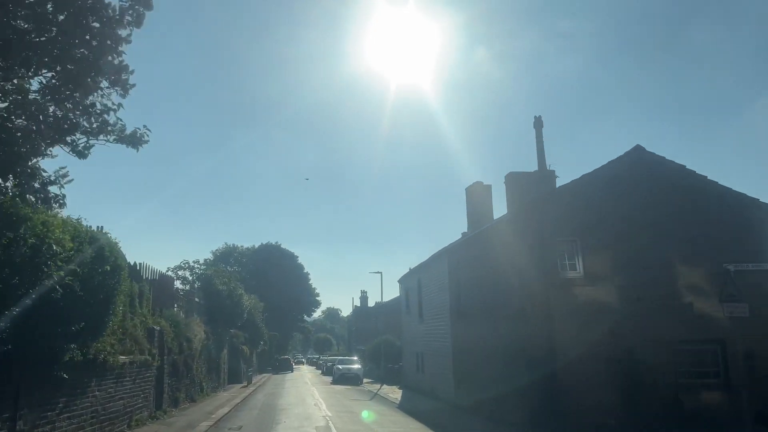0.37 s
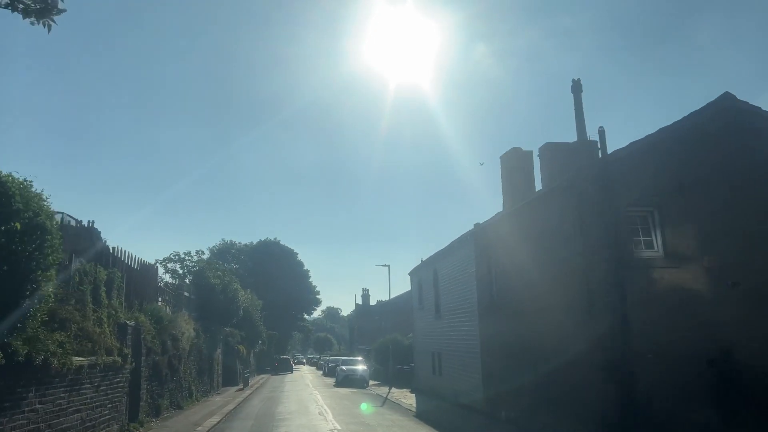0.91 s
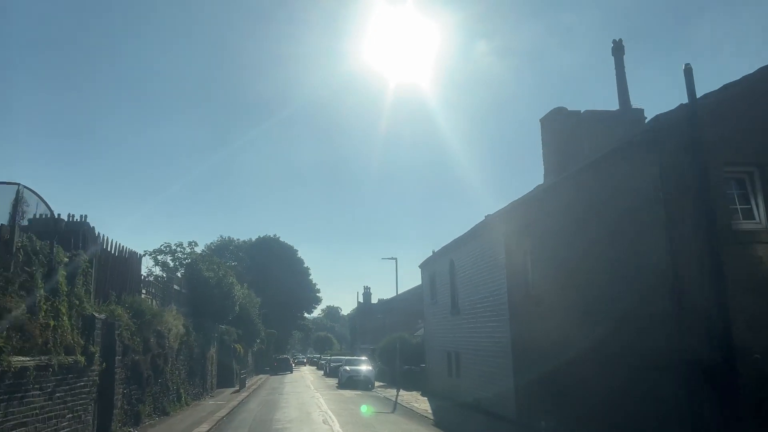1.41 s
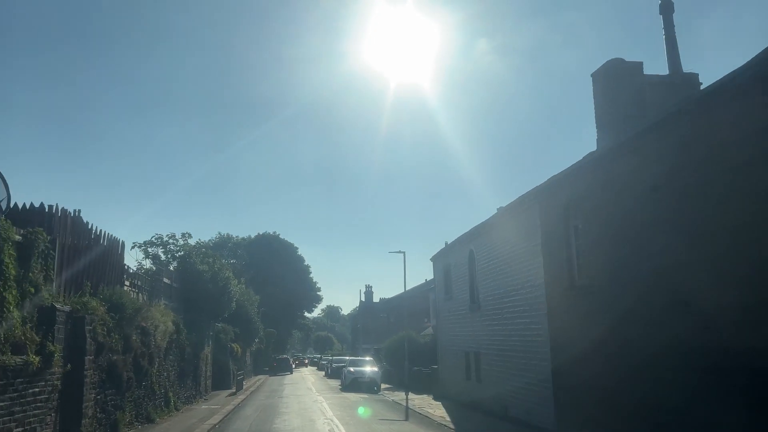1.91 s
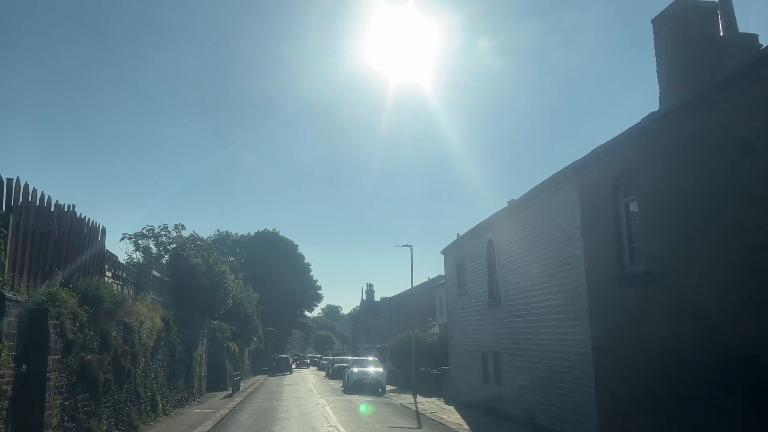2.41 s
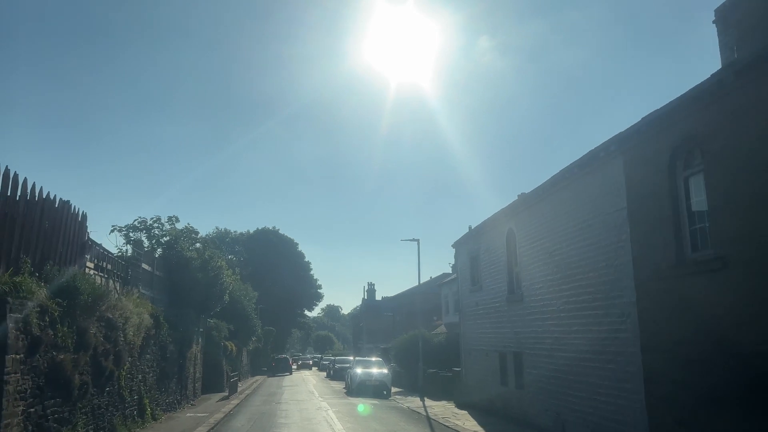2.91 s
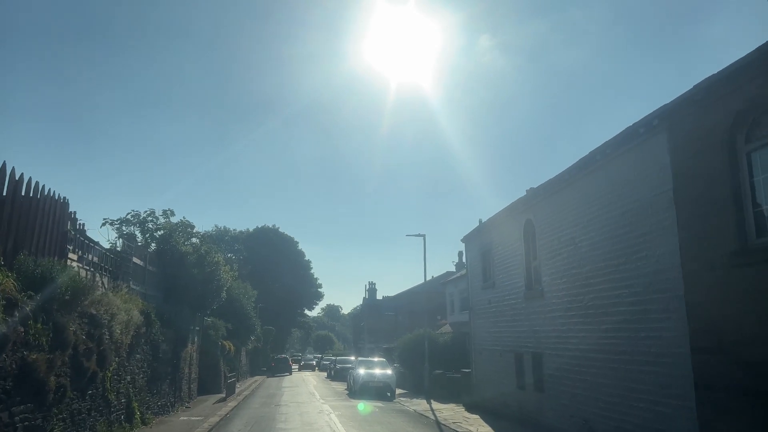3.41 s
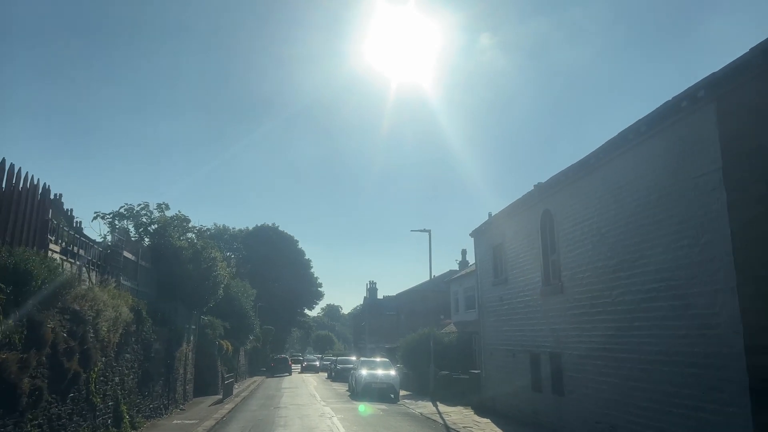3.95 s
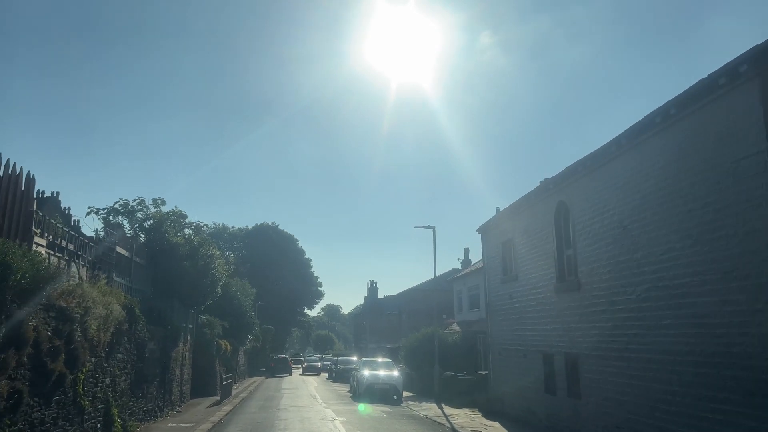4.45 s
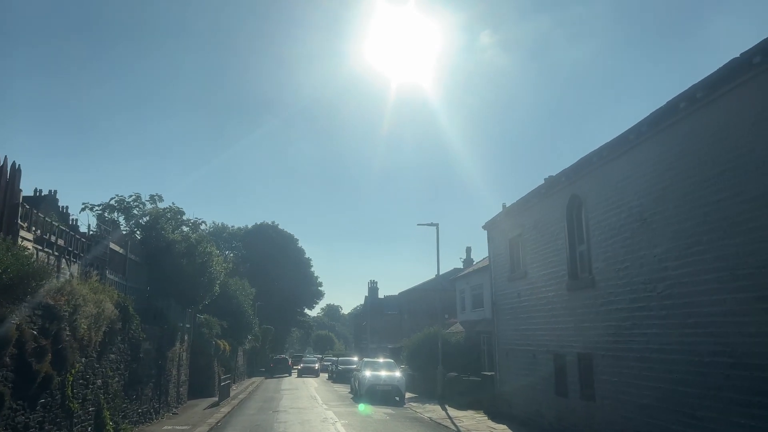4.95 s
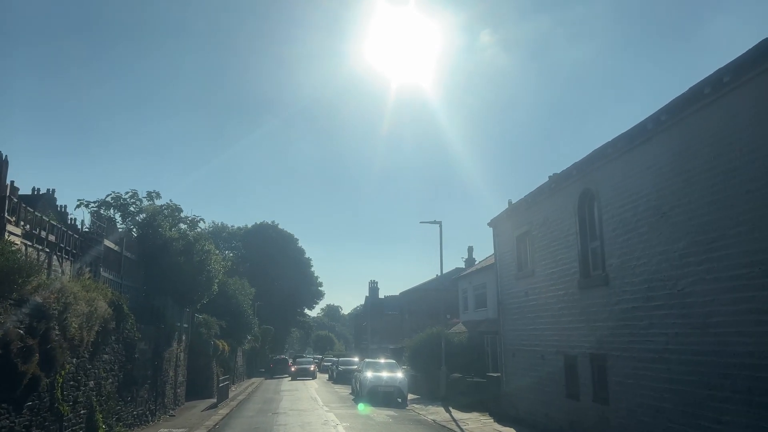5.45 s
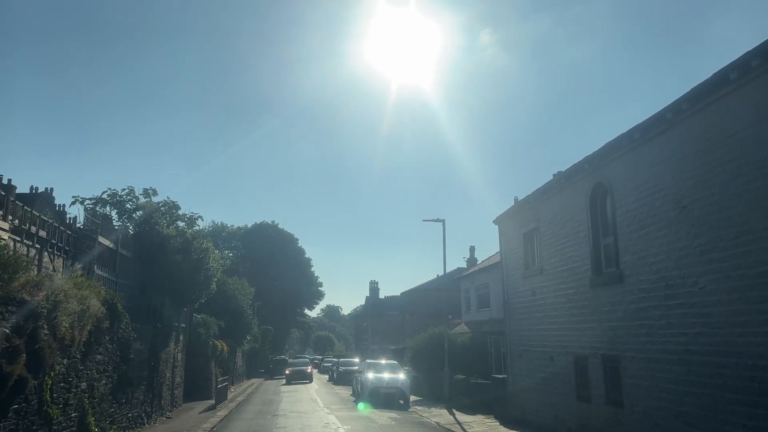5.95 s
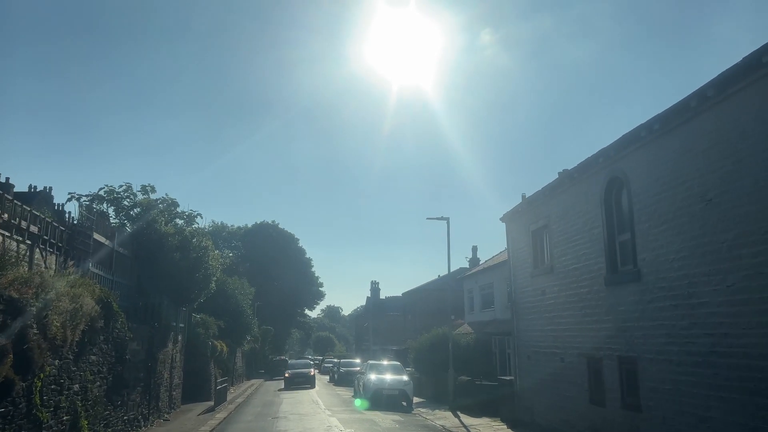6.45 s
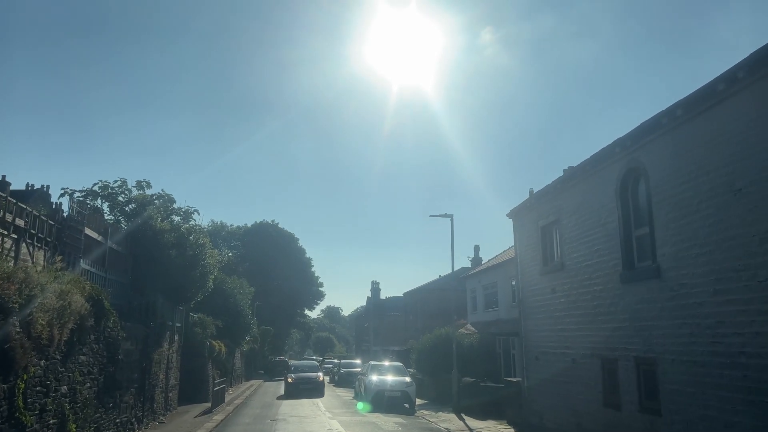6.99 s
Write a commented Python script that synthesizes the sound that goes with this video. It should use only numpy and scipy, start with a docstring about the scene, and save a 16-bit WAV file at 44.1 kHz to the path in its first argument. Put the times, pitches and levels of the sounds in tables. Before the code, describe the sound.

Inside a bus cabin on a town street, bass-heavy diesel hum and road rumble dominate. The engine drops in pitch, rises briefly for a lower gear, then sinks to a steady clattering idle. A dull cluster of bumps comes just before three seconds; afterwards the road noise thins out. Faint trim ticks and buzzing sit on top. Close stereo cabin microphone, bass centred, higher sounds wider.

```python
"""Inside a bus that slows to a crawl on a town street, on a microphone with two ports.
The four-cylinder diesel beyond the bulkhead winds down, blips for a lower gear and settles at idle: lines and clatter.
The road underneath shakes the floor and makes the cabin boom until the wheels nearly stop: noise and blows on resonances.
Trim and window frames rattle faintly: grainy noise, ticks and squeaks. The ports share the bass and differ higher up."""
import sys
import numpy as np
from scipy import signal
from scipy.fft import rfft, irfft
from scipy.io import wavfile
from scipy.ndimage import uniform_filter1d

SR = 44100
rng = np.random.default_rng(int(sys.argv[2]) if len(sys.argv) > 2 else 0)


def volts_from_db(level):
    """Convert decibel levels to linear amplitude ratios."""
    exponent = np.asarray(level, float) / 20
    return 10 ** exponent


def persist_wave(psi):
    """Save psi, clipped to +-1, as 16-bit WAV."""
    counts = np.round(np.clip(psi, -1, 1) * 32767).astype(np.int16)
    wavfile.write(sys.argv[1], SR, np.atleast_2d(counts).T)


N = 313110
TIME = np.arange(N) / SR
HZ = np.fft.rfftfreq(N, 1 / SR) + 1e-3  # kept off zero for the divisions

# engine, off the throttle while slowing: (time [s], firing rate [Hz], hum level [dB], clatter level [dB])
ENGINE = [(0, 40.95, -38, -37), (.5, 40.3, -21, -39), (.9, 38.44, -27.5, -38.5), (1.6, 30.84, -30.5, -40.5),
          (2.2, 27.02, -26.5, -41.5), (2.7, 29, -31, -41.5), (3.2, 30.58, -32, -42.5),
          (3.6, 28.02, -33, -42), (3.9, 25.43, -31.5, -41), (4.2, 25.5, -30, -42), (5, 25.43, -30, -41.5),
          (6, 25.27, -31, -41.5), (7.1, 25.1, -32, -41.5)]
# lines in the hum of the firings: (multiple of the firing rate, relative level [dB])
HUM_LINES = [(1, -10), (2, -1), (3, 0), (4, -12), (5, -18), (6, -15), (7, -9.5), (8, -21), (9, -19),
             (10, -22), (11, -27), (12, -23), (13, -22), (14, -29), (15, -29), (16, -30), (17, -25),
             (18, -34)]
# clatter through the bulkhead: (frequency [Hz], relative level [dB per Hz])
BULKHEAD = [(120, -23), (160, -8), (200, -5.5), (400, -7), (500, -8), (640, -10.5), (880, -15.5),
            (1050, -19), (1350, -18), (1500, -23), (1800, -21), (2400, -24.5), (3000, -28), (3400, -28.5),
            (4300, -33), (8000, -41), (11000, -69.5)]
# panels that ring in the clatter: (frequency [Hz], width [Hz], level over the rest before flutter [dB])
PANELS = [(435, 18, 7), (510, 16, 4), (532, 16, 5), (584, 20, 8), (599, 14, 13), (668, 18, 10),
          (778, 24, 7), (930, 50, 5), (995, 40, 5), (1100, 40, 4), (1170, 40, 5), (1228, 30, 11.5),
          (1262, 20, 6), (1298, 36, 8), (1365, 40, 4), (1442, 16, 9), (1560, 60, 6), (1630, 60, 4),
          (1690, 50, 5), (1717, 28, 10.5), (2180, 40, 6), (2205, 32, 10), (2260, 24, 6), (2310, 16, 5),
          (2470, 20, 4), (2545, 45, 7), (2700, 40, 3), (2810, 60, 5), (2892, 50, 5), (3220, 120, 3)]
# road under the slowing wheels: (time [s], shaking of the body [dB], rolling of the tyres [dB])
ROAD = [(0, -27, -30.5), (.3, -22, -26), (.7, -27, -29.5), (1.1, -22, -29.5), (1.5, -23.5, -32.5),
        (2.1, -23, -39), (2.7, -26, -38.5), (3.2, -24.5, -40), (3.5, -32.5, -44.5), (4.15, -29.5, -42.5),
        (4.6, -36.5, -43), (5.6, -35, -47), (7.1, -31.5, -43)]
# resonances, one list each for boom, floor, thrum and cavity: (frequency [Hz], width [Hz], relative level [dB])
ROAD_MODES = [
    [(33, 7.4, -21), (45.75, 7.3, -9), (58.34, 1.97, -5)],
    [(69.1, 26, -0.5), (86, 7.6, -7), (99.2, 13.5, -7)],
    [(126, 16, -3), (140, 14, 0), (163, 24, -5)],
    [(196, 64, -1), (294.5, 58.6, -1.5), (378, 54, -11.5)],
]
# wheels striking a ridge: (time [s], then blow to boom, floor, thrum and cavity before the mode levels [dB])
BUMPS = [(2.752, -14, -8.5, -13, -23), (2.784, -25.5, -16.5, -15, -25), (2.804, -22, -9, -12, -24),
         (2.818, -25, -13, -18, -27.5), (2.951, -24, -8, -21.5, -30), (2.995, -28, -18, -17, -28)]
# each family of resonances: (level over its drive [dB])
FAMILY_DB = [-1.5, 0.5, -0.5, -4.5]
# the rumble of each family wavers at random: (spread [dB])
WAVER_DB = [2.8, 2.48, 2, 1.2]
# a rough patch under the tyres: (level added to each family at its start [dB])
PATCH_DB = [4.5, 3.8, 17.9, 6.3]
# low tones that swell within the rumble: (middle [s], length [s], frequency [Hz], peak level [dB])
THROBS = [(0.059, 0.51, 41.4, -8), (.29, 0.109, 178.5, -22.5), (0.482, 0.19, 54, -20),
          (0.59, 0.11, 56.6, -13), (0.82, 0.18, 70.8, -16.5), (0.909, 0.15, 126.8, -20.5),
          (1.055, 0.091, 143.6, -12.5), (1.141, 0.24, 58.3, -18), (1.489, 0.062, 61.3, -13),
          (1.581, 0.14, 71.7, -15.5), (1.796, 0.13, 86, -15.5), (1.838, 0.15, 66.6, -17),
          (2.153, 0.059, 81.3, -20.5), (2.268, .24, 54.6, -10.5), (2.352, 0.086, 95.7, -16),
          (2.428, 0.054, 80.6, -10), (2.571, .11, 75, -12.5), (2.915, 0.033, 152, -17),
          (3.04, 0.15, 63.6, -14.5), (3.137, 0.075, 72, -19), (3.285, 0.11, 70.7, -21),
          (3.407, 0.14, 56.8, -17), (3.624, 0.24, 49.7, -12), (3.929, 0.26, 46.5, -15.5),
          (4.31, 0.17, 44.4, -21)]
# loose trim buzzing: (time [s], level [dB])
TRIM = [(0, -60.5), (.46, -59.5), (.7, -62.5), (1.5, -63), (2.05, -66.5), (2.15, -63), (3.0, -64.5),
        (3.15, -60.5), (3.45, -62), (3.8, -61.5), (3.9, -64.5), (4.0, -61), (4.15, -73.5), (4.5, -67),
        (5.85, -64.5), (6.0, -57.5), (6.16, -64.5), (6.3, -68.5), (6.7, -66), (7.1, -67)]
# tone of the trim: (frequency [Hz], relative level [dB per Hz])
TRIM_COLOUR = [(2500, -21.5), (3500, -8.5), (4400, -7), (5400, -0.5), (6200, -2.5), (7000, -5.5),
               (8000, -9), (9000, -6.5), (9600, -12), (11200, -10), (13000, -22), (15500, -21)]
# single ticks of the trim: (time [s], peak of the drive [dB], length [ms])
TICKS = [(.319, -57, 12), (.83, -55, 16), (1.134, -60, 14), (1.476, -57, 14), (2.217, -66, 16),
         (2.911, -59, 22), (3.174, -60, 15), (3.36, -64, 18), (3.535, -61, 22), (3.62, -64, 20),
         (3.72, -63, 30), (3.829, -58, 10), (3.843, -60, 12), (4.168, -62, 45), (4.771, -62, 14),
         (5.398, -63, 16), (6.52, -62, 12), (6.68, -64, 16), (7.06, -60, 20)]
# short squeaks of a seal: (time [s], length [s], frequency [Hz], level before the swell [dB])
SQUEAKS = [(2.215, .04, 12200, -69), (6.105, .022, 4900, -64), (6.118, .026, 5280, -59),
           (6.139, .014, 4200, -61)]
# how alike the two ports are: (frequency [Hz], likeness [0-1])
LIKENESS = [(30, .9995), (90, .99), (140, .96), (200, .94), (260, .75), (330, .85), (450, .3), (520, .6),
            (1500, .6), (2200, .5), (3000, .3), (6500, .3), (8300, .65), (9500, .9), (12000, .97)]
# phase by which the left port leads: (frequency [Hz], lead [rad])
LEAD = [(0, 0), (340, 0.5), (420, 1), (520, 1.5), (690, 4), (950, 5), (1290, 5.5), (1720, 4.5), (1980, 4.5),
        (2410, 4.5), (2760, 7.5), (7500, 7.5), (9000, 7.5), (10500, 8.5), (16000, 6.5)]
# balance of the ports: (frequency [Hz], left minus right [dB])
BALANCE_DB = [(30, -.2), (60, -.8), (300, -1.2), (490, -1.5), (740, -.6), (1130, -2), (1800, -.4),
              (3000, 1.5), (5000, 4.5), (7500, 1), (10000, 1)]

IDLE_HZ = 25.33  # firing rate at idle


def unit(x):
    """Scale to rms 1."""
    return x / np.sqrt(np.mean(x ** 2))


def over_time(table):
    """Columns of a curve table, one value a sample."""
    s, *columns = np.transpose(table)
    return [np.interp(TIME, s, column) for column in columns]


def over_hz(table, at_hz=HZ):
    """A (Hz, value) table on a log-frequency axis."""
    hz, value = np.transpose(table)
    return np.interp(np.log(at_hz), np.log(hz + 1), value)


def resonance(hz, width_hz):
    """Gain of a band-pass resonance, 1 at its centre."""
    return 1 / np.sqrt(1 + ((HZ ** 2 - hz ** 2) / (HZ * width_hz)) ** 2)


def colour(x, gain):
    """Filter by a gain over frequency, then scale to rms 1."""
    return unit(irfft(rfft(x) * gain, N))


def noise():
    """Two unrelated noises: what both ports share, and what the right one hears alone."""
    return rng.standard_normal((2, N))


def walk(rate):
    """Random levels held 1 / rate s and slewed twice; spread 1."""
    k = int(SR / rate)
    held = np.repeat(rng.standard_normal(N // k + 1), k)
    slewed = uniform_filter1d(uniform_filter1d(held, k), k)
    return unit(slewed[:N])


def engine_hum(firings, dull_db):
    """Steady firings hum as clean lines at multiples of the firing rate, each wavering in level."""
    hum = 0
    for k, db in HUM_LINES:
        start = 2 * np.pi * rng.random((2, 1))
        level = volts_from_db(db + k * dull_db + 1.8 * walk(4))
        hum = hum + level * np.sin(2 * np.pi * k * firings + start)
    return unit(hum)


def engine_clatter(firings, firing_hz, dull_db):
    """Valve and combustion clatter swells once a firing, comes through the bulkhead and rings the panels."""
    # each firing knocks with its own strength; every second one is a little weaker
    number = firings.astype(int)
    strength_db = 3.5 * (2 * rng.random(N // 100) - 1)[number] - 2.2 * (number % 2)
    knock = 1 + 0.5 * volts_from_db(strength_db) * np.exp(-(firings % 1) / 0.6)
    source = rfft(knock * noise()) * volts_from_db(over_hz(BULKHEAD))
    # faster running adds a whirr around the loudest panels
    whirr_gain = 0.05 * np.clip(firing_hz - IDLE_HZ, 0, None)
    clatter = irfft(source, N) + whirr_gain * irfft(source * resonance(1250, 700) ** 2, N)
    # every third panel shares a flutter of its own; all ring clearest at idle
    for k in range(3):
        ring = sum((volts_from_db(db) - 1) * resonance(hz, width) ** 2 for hz, width, db in PANELS[k::3])
        flutter = volts_from_db(0.54 * dull_db + 2.8 * walk(20))
        clatter = clatter + flutter * irfft(source * ring, N)
    return unit(clatter)


def engine():
    """The diesel's firing rate sets the pitch of its hum and the pulse of its clatter."""
    firing_hz, hum_db, clatter_db = over_time(ENGINE)
    firings = np.cumsum(firing_hz * (1 + 0.0015 * walk(3))) / SR
    # without fuel above idle the firings are soft and lose their upper multiples
    dull_db = -.3 * np.clip(firing_hz - IDLE_HZ, 0, 6)
    hum = volts_from_db(hum_db) * engine_hum(firings, dull_db)
    return hum + volts_from_db(clatter_db) * engine_clatter(firings, firing_hz, dull_db)


def ridges(family, modes):
    """Wheels striking a ridge set every mode of a family ringing and dying away."""
    out = 0
    for s, *blow_db in BUMPS:
        age = np.clip(TIME - s, 0, .5)
        # the tyre cushions the blow, so the ring takes a moment to build
        push = volts_from_db(blow_db[family]) * (1 - np.exp(-age / 0.004))
        for hz, width, db in modes:
            out = out - push * volts_from_db(db) * np.sin(2 * np.pi * hz * age) * np.exp(-np.pi * width * age)
    return out


def road():
    """Road roughness drives four families of cabin, floor and tyre resonances; ridges strike them all at once."""
    shake_db, roll_db = over_time(ROAD)
    # the cavity falls 0.54 dB for each dB of rolling below its loudest
    cavity_db = roll_db.max() + 0.54 * (roll_db - roll_db.max())
    # boom and floor follow the shaking, thrum and cavity the rolling
    drives_db = [shake_db, shake_db, roll_db, cavity_db]
    patch_start_s, patch_length_s, patch_fade_db = 2.752, .4, -7.5  # the fade runs over the patch length
    along = (TIME - patch_start_s) / patch_length_s
    patch = uniform_filter1d(1. * (along > 0) * (along < 1), size=300)
    out = 0
    for family, (drive_db, modes) in enumerate(zip(drives_db, ROAD_MODES)):
        gain = sum(volts_from_db(db) * resonance(hz, width) ** 2 for hz, width, db in modes)
        ring = colour(noise(), gain)
        # a steadily driven resonance wavers less than free noise
        swing = np.abs(signal.hilbert(ring)) + 0.13
        waver_db = WAVER_DB[family] * walk(10)
        rough_db = patch * (PATCH_DB[family] + patch_fade_db * along)
        level = volts_from_db(drive_db + FAMILY_DB[family] + waver_db + rough_db)
        out = out + level * unit(ring / swing ** 0.7) + ridges(family, modes)
    return out


def throbs():
    """Low tones swell and fade within the rumble, from a few cycles to about twenty."""
    out = np.zeros((2, N))
    for s, length, hz, db in THROBS:
        start = rng.random((2, 1))  # in cycles
        at = slice(max(int((s - length / 2) * SR), 0), int((s + length / 2) * SR))
        age = TIME[at] - s
        swell = np.cos(np.pi * age / length) ** 2
        out[:, at] += volts_from_db(db) * swell * np.sin(2 * np.pi * (hz * age + start))
    return out


def trim_grain():
    """Dense small contacts of random strength, each dying away in 24 ms, over a steady floor."""
    contacts = np.zeros(N)
    place, strength = rng.random((2, int(60 * N / SR)))  # 60 contacts a second
    np.add.at(contacts, (place * N).astype(int), volts_from_db(6.3 * strength ** 2))
    return 3.6 + signal.lfilter([1], [1, -np.exp(-1 / (0.024 * SR))], contacts)


def squeaks():
    """A seal squeaks: narrow noise around one pitch swells and fades."""
    out = 0
    for s, length, hz, db in SQUEAKS:
        swell = np.sin(np.pi * np.clip((TIME - s) / length, 0, 1)) ** .5
        out = out + volts_from_db(db) * swell * colour(noise(), resonance(hz, 140) ** 2)
    return out


def trim():
    """Dense small contacts in the trim make a grainy buzz; a few ticks and squeaks stand out."""
    # the engine shakes the trim once a firing
    firing_hz = over_time(ENGINE)[0]
    shaken = 1 + .15 * np.sin(2 * np.pi * np.cumsum(firing_hz) / SR)
    drive = volts_from_db(over_time(TRIM)[0]) * unit(trim_grain() * shaken * volts_from_db(0.76 * walk(9.8)))
    for s, db, ms in TICKS:
        age = np.clip(TIME - s, 0, None) * 1000 / max(ms, 1)  # in tick lengths
        drive = drive + volts_from_db(db) * 3 * age * np.exp(1 - 3 * age)  # peaks a third of the way in
    shape = volts_from_db(over_hz(TRIM_COLOUR))
    shape = shape / np.sqrt(np.mean(shape ** 2))
    return irfft(rfft(drive * noise()) * shape, N) + squeaks()


def two_ports(sound):
    """The right port hears the shared sound late and mixed with its own reflections."""
    # mirrored in time so that the filtering meets no jump at the ends
    shared, own = rfft(np.hstack([sound, sound[:, ::-1]]))
    hz = np.fft.rfftfreq(2 * N, 1 / SR) + 1e-3
    like = np.clip(over_hz(LIKENESS, hz), 0, 1)
    lead = np.interp(hz, *np.transpose(LEAD))
    right = like * shared * np.exp(-1j * lead) + np.sqrt(1 - like ** 2) * own
    tilt = volts_from_db(over_hz(BALANCE_DB, hz) / 2)  # half the balance on each side
    return irfft(np.array([shared * tilt, right / tilt]), 2 * N)[:, :N]


def scene():
    """Engine, road, throbs and trim add up in the cabin and reach both ports."""
    return two_ports(engine() + road() + throbs() + trim())


def top_cut(x):
    """Nothing passes above the cut-off."""
    return signal.sosfilt(signal.butter(12, 15760, fs=SR, output="sos"), x)


def record(dry):
    """The microphone loses the deepest bass, below 30 Hz."""
    low_cut = signal.butter(2, 30, "high", fs=SR, output="sos")
    mix = signal.sosfilt(low_cut, dry)
    return top_cut(mix)


dry = scene()
out = record(dry)
persist_wave(out)
```